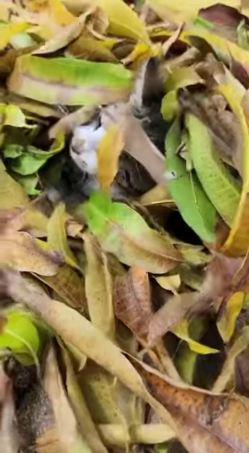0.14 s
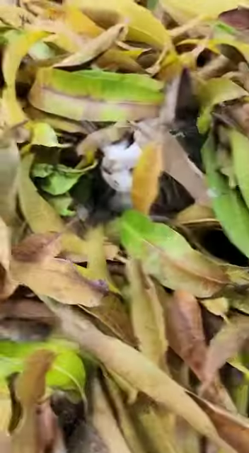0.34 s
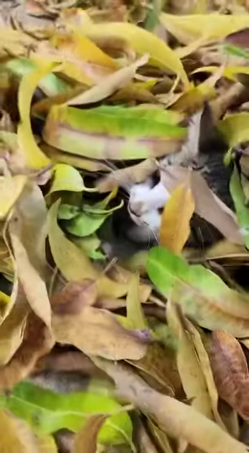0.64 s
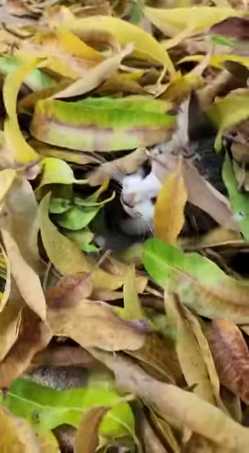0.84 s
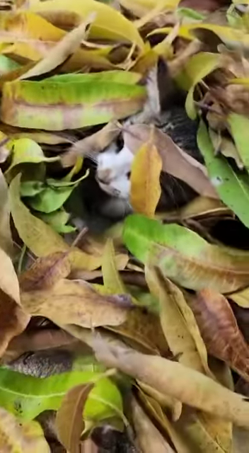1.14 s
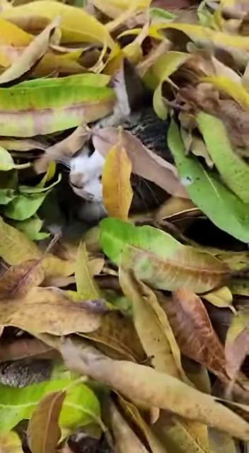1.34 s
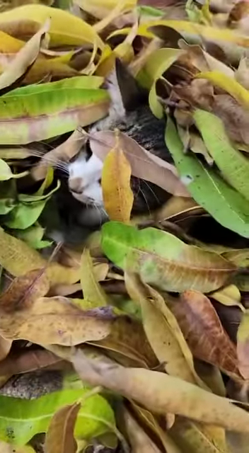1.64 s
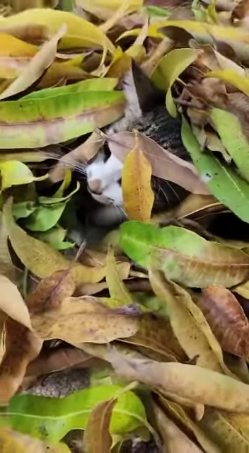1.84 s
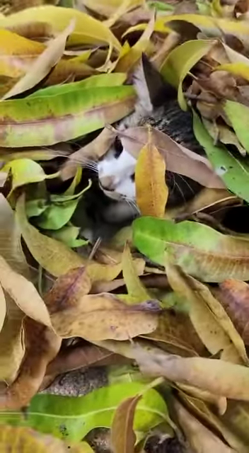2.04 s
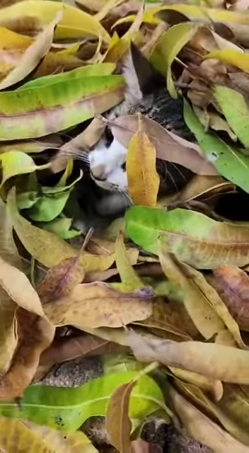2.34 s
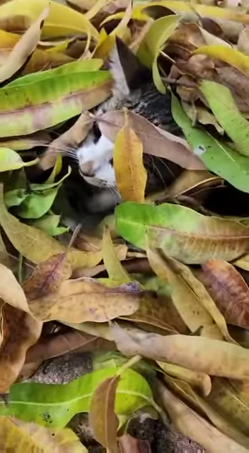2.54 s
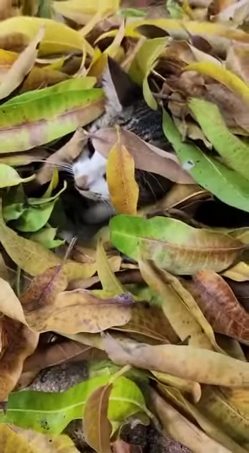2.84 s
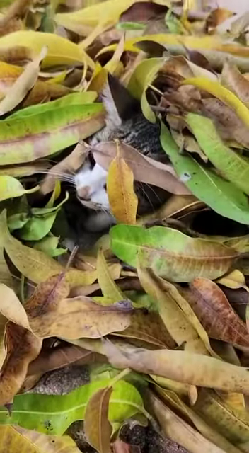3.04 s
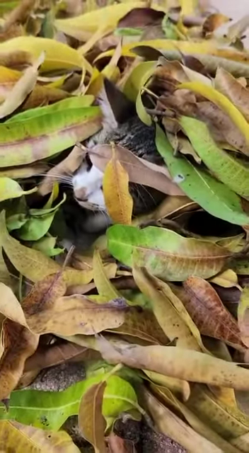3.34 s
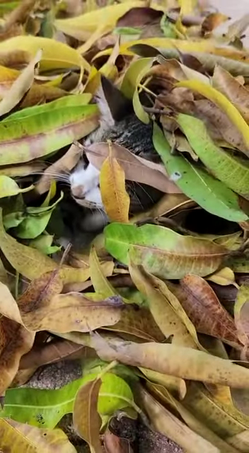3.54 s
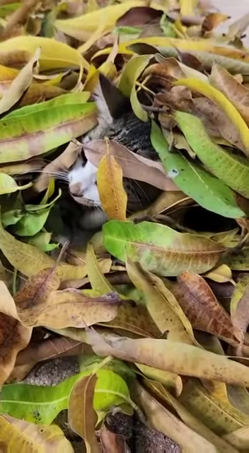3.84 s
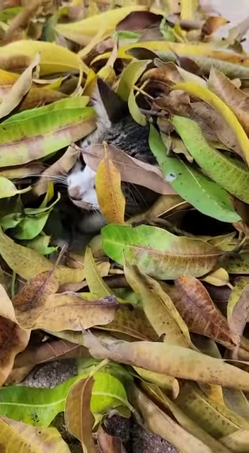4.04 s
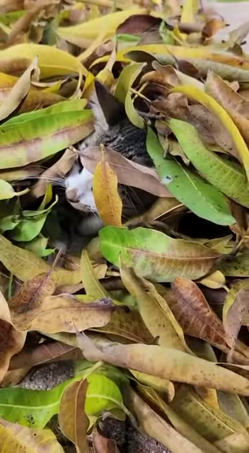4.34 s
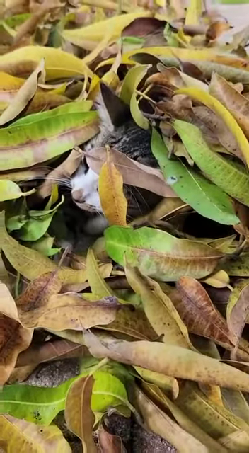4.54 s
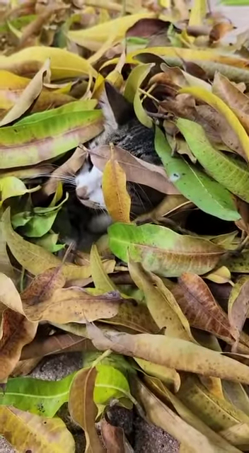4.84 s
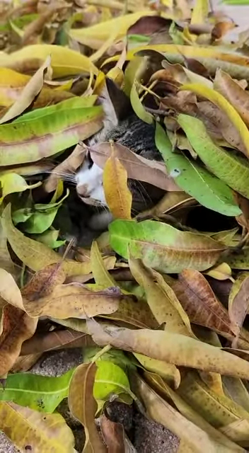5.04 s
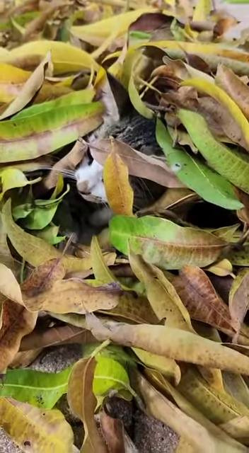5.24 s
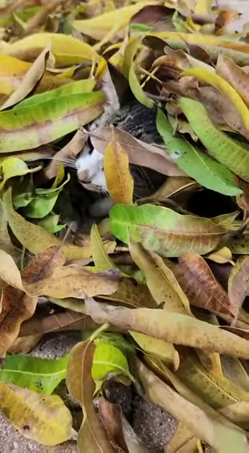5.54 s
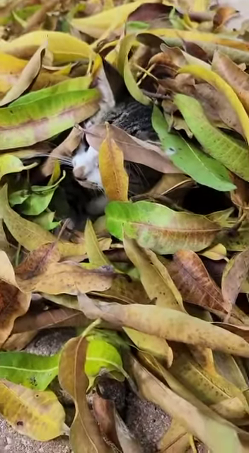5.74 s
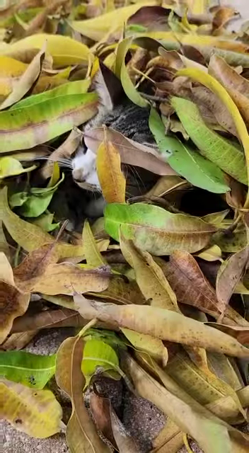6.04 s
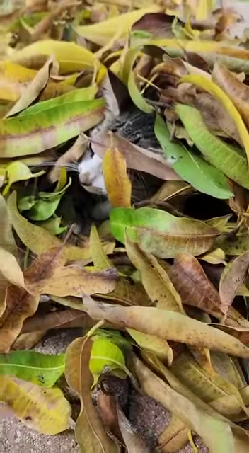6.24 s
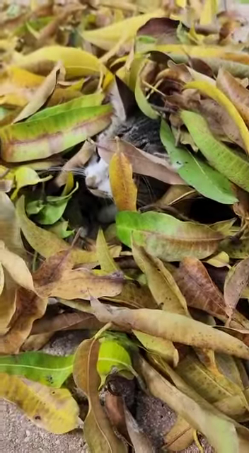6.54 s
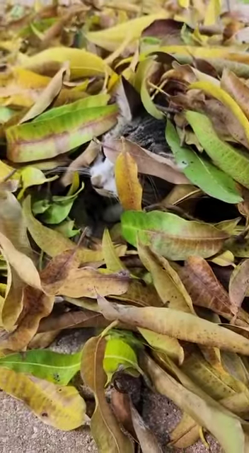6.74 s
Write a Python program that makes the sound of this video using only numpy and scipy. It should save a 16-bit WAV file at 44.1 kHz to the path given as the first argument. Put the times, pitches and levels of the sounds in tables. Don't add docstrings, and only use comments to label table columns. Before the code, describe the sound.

Thin whistles lead into raspy, cracking kitten cries that echo off walls, with leaf rustle and ticks, low wind thumps and faint traffic.

```python
import sys
import numpy as np
from scipy import signal
from scipy.fft import rfft, irfft, next_fast_len
from scipy.io import wavfile
from scipy.ndimage import uniform_filter1d

SR = 44100
rng = np.random.default_rng(int(sys.argv[2]) if len(sys.argv) > 2 else 0)


def persist_wave(psi):
    counts = np.round(np.clip(psi, -1, 1) * 32767).astype(np.int16)
    wavfile.write(sys.argv[1], SR, np.atleast_2d(counts).T)


def gain_from_db(level_db):
    decades = np.asarray(level_db, float) / 20
    return 10 ** decades


N = 303399
TIME = np.arange(N) / SR
FAST = next_fast_len(N, True)
BINS = np.maximum(np.fft.rfftfreq(FAST, 1 / SR), 1)

# time in seconds, pitch in Hz, level in dB.
CRY_CONTOURS = [
    [(.964, 1390, -42), (.985, 1751, -29.5), (.998, 1928, -26), (1.04, 2059, -20.5), (1.085, 2280, -15),
     (1.115, 2276, -18), (1.14, 2270, -28)],
    [(1.432, 1449, -34), (1.45, 1700, -28), (1.48, 2003, -21), (1.5, 2035, -16), (1.543, 2073, -20),
     (1.558, 2189, -14.5), (1.64, 2134, -14.5), (1.69, 2041, -21.5), (1.735, 1902, -28)],
    [(3.593, 1600, -40), (3.625, 2003, -37), (3.66, 2102, -34), (3.712, 2187, -28.5), (3.73, 2402, -26.5),
     (3.75, 2330, -25), (3.78, 2416, -42.5)],
    [(3.793, 1501, -25), (3.812, 1830, -23.5), (3.84, 1929, -18.5), (3.903, 2053, -16), (3.915, 2215, -18),
     (4.005, 2120, -14.5), (4.04, 1990, -23), (4.08, 1792, -39)],
    [(5.66, 1600, -39), (5.69, 1880, -39), (5.72, 2093, -37.5), (5.77, 2159, -35), (5.785, 2320, -35),
     (5.82, 2350, -35), (5.85, 2230, -25.5), (5.9, 2050, -36), (5.97, 1747, -50)],
]
# break time in seconds, unsteadiness at the break (0-1),
# unsteadiness added by the end (0-1), half-pitch level after the break in dB, least breath level in dB.
CRY_BREAKS = [
    (1.13, 0, 0.03, -40.5, -34),
    (1.56, .05, .6, -11, -36),
    (3.72, .3, .2, -25, -15),
    (3.92, .05, .65, -10, -36),
    (5.775, .27, .5, -18, -17),
]
# lowest partial in dB, top partials in dB.
CRY_COLOURS = [(0.5, 13), (-4.5, 11), (3.5, -2), (-5, 12), (-1, 9)]
# frequency in Hz, gain in dB.
THROAT_GAIN = [(1000, -41.5), (1500, -24.5), (2100, -14), (2600, -17.5), (3300, -5), (4200, -3),
               (5300, -2.5), (6300, -3.5), (7300, -3.5), (8200, -13), (10000, -29), (13000, -30),
               (15800, -35)]
# frequency in Hz, gain in dB.
BREATH_GAIN = [(1000, -29), (1500, -16), (2400, -18.5), (3300, 0.5), (4400, -7.5), (5500, -6.5),
               (7200, -13.5), (9000, -15.5), (15800, -29.5)]
# start in seconds, length in seconds, first pitch in Hz, last pitch in Hz, level in dB.
WHISTLE_EVENTS = [(.9, 0.07985, 1990, 2147, -65.5), (1.33, .1, 2050, 2220, -60),
                  (1.43, .035, 2220, 2400, -49), (2.86, 0.11898, 2100, 2038, -63.5),
                  (3.39, .04, 2030, 2130, -64), (3.44, .135, 2190, 2680, -51.5),
                  (5.42, .065, 1840, 2091, -57), (5.49, .085, 2110, 2380, -54),
                  (5.575, 0.0762, 2320, 2188, -61), (5.775, .035, 2420, 2642, -50.5),
                  (5.81, 0.0613, 2520, 2544, -62), (6.35, 0.1016, 2110, 2070, -65),
                  (6.52, 0.13295, 2100, 2064, -67.5)]
# band centre in Hz, time to fall 60 dB in seconds.
ECHO_T60 = [(1500, 0.7227), (3000, 0.5398), (4500, 0.46327), (6500, 0.49328), (9000, 0.40005), (14000, 0.3)]
# frequency in Hz, left minus right in dB.
ANIMAL_LEAN = [(1500, -7), (2200, 3.5), (3300, 3.5), (4300, 6.5), (6300, 5), (7500, 1), (8500, -2),
               (10500, -5), (14000, 4)]
# peak time in seconds, peak level in dB, seconds to swell 10 dB, seconds to fade 10 dB.
RUSTLES = [(.02, -67.5, 0.088, 0.1696), (.45, -78.5, 0.348, 0.2877), (.614, -66, 0.0321, 0.0097),
           (.69, -77, 0.0989, .06), (2.376, -82, .02, .03), (2.72, -83.5, 0.4365, 0.0968),
           (2.808, -69, 0.0755, 0.1043), (3.49, -75, 0.0012, 0.0959), (6.2, -88, 0.4837, 0.0138),
           (6.5, -89, 0.1513, 0.0079), (6.75, -93, 0.24, 1.1777)]
# frequency in Hz, gain in dB.
LEAF_GAIN = [(1180, -34), (2000, -1.5), (2140, -3.5), (4030, -7.5), (4360, -9), (7190, -5), (8930, -19),
             (15800, -24.5)]
# start in seconds, peak level in dB, ring in Hz, left minus right in dB.
LEAF_TICKS = [(0.06, -47, 7290, 2.5), (0.1987, -45.5, 4616, 12), (0.513, -45, 5557, 4),
              (0.61, -29, 4285, 16.5), (0.614, -33, 4561, -6), (2.3693, -49, 2810, 2.5),
              (2.6794, -57, 2500, 9.5)]
# time in seconds, level in dB.
GUST_LEVELS = [(0, -41), (1.3, -39.5), (1.65, -41.5), (1.95, -39.5), (2.14, -32.5), (2.25, -35),
               (2.48, -32.5), (2.6, -39.5), (2.9, -37.5), (3.3, -38.5), (3.5, -43), (3.89, -38),
               (4.05, -41.5), (4.55, -41), (4.69, -35), (4.92, -44), (5.6, -40.5), (6.88, -44)]
# frequency in Hz, gain in dB.
BUFFET_GAIN = [(8.8, -51.5), (15, -38), (40, 1), (64, -4), (96, -5), (151, -24), (358, -36), (400, -30),
               (520, -67), (880, -120)]
# time in seconds, peak level in dB, frequency in Hz.
PORT_THUMPS = [(1.998, -29.5, 70.6), (2.11, -17.5, 58.97), (2.189, -32, 54), (2.248, -25, 79),
               (2.298, -23.5, 69.72), (2.35, -30, 48.4), (2.46, -23, 67.51), (2.599, -31, 66.9),
               (2.828, -25.5, 61.8), (2.919, -28, 43.16), (3.201, -26, 40.57), (3.38, -26.5, 58.22),
               (3.841, -29, 83.07), (4.681, -29.5, 101.4), (5.519, -33.5, 40.15)]
# frequency in Hz, level in dB per Hz.
TOWN_GAIN = [(60, -30), (100, -3), (170, -7), (320, -13.5), (358, -10), (395, -20), (830, -19), (1500, -24),
             (1800, -27), (3400, -34), (7400, -38), (8700, -51), (10000, -58), (15800, -66)]
# frequency in Hz, left-right likeness (-1 to 1).
TOWN_LIKENESS = [(60, 1), (130, 0.9826), (290, 0.9153), (640, 0.6123), (1410, -0.7613), (3100, 0.2915),
                 (6820, -0.37), (15000, 0.29)]


def unit(x):
    return x / np.sqrt(np.mean(x ** 2))


def read(table, hz):
    table_hz, value = np.array(table).T
    return np.interp(np.log(hz), np.log(np.maximum(table_hz, 1)), value)


def colour(x, gain):
    return irfft(rfft(x, FAST) * gain, FAST)[..., :N]


def walk(rate_hz):
    hold = max(int(SR / rate_hz), 1)
    steps = np.repeat(rng.standard_normal(N // hold + 1), hold)
    return unit(uniform_filter1d(uniform_filter1d(steps, hold), hold)[:N])


def pair(likeness):
    mid, side = rfft(rng.standard_normal((2, FAST)))
    share = np.clip(likeness, -.15, .99)
    sign = np.array([[1], [-1]])
    return irfft(np.sqrt(1 + share) * mid + np.sqrt(1 - share) * side * sign, FAST)[:, :N]


def opposed(pan_db):
    return np.array([pan_db, -pan_db]) / 2


def voice(hz, wobble, half_db, low_db, top_db):
    phase = 2 * np.pi * np.cumsum(hz * wobble) / SR
    tone, power = 0, 0
    for k in np.arange(.5, 9.6, .5):
        gain_db = read(THROAT_GAIN, k * hz)
        if k % 1:
            gain_db = gain_db + half_db
        if k == 1:
            gain_db = gain_db + low_db
        if k > 4:
            gain_db = gain_db + top_db
        gain = gain_from_db(gain_db) * (k * hz < .42 * SR)
        tone = tone + gain * np.sin(k * phase + rng.uniform(0, 2 * np.pi))
        power = power + gain ** 2 / 2
    return tone / np.sqrt(power)


def cries():
    wobble = .06 * walk(120) + .045 * walk(600)
    shimmer = walk(90)
    air = unit(colour(rng.standard_normal(N), gain_from_db(read(BREATH_GAIN, BINS))))
    out = np.zeros(N)
    for contour, cry_break, (chest_db, bright_db) in zip(CRY_CONTOURS, CRY_BREAKS, CRY_COLOURS):
        break_s, cracked, hoarse, rattle_db, least_breath_db = cry_break
        s, hz, db = np.transpose(contour)
        on = (TIME > s[0]) & (TIME < s[-1])
        t = TIME[on]
        hz, db = np.interp(t, s, hz), np.interp(t, s, db)
        age_s, broken_s = t - s[0], np.maximum(t - break_s, 0)

        rough = .045 + .9 * np.exp(-(age_s / .022) ** 2 / 2)
        rough = rough + cracked * (broken_s > 0) + hoarse * (broken_s / (s[-1] - break_s)) ** 1.6
        onset_half_db = -8 - 479.5 * age_s
        break_half_db = np.minimum(-37 + 480 * broken_s, rattle_db)
        half_db = np.maximum(onset_half_db, break_half_db)
        breath_db = np.clip(-41.5 + 63 * rough, least_breath_db, 0.5)

        under_db = db.max() - db
        low_db = np.minimum(chest_db + .8 * under_db, 9)
        top_db = bright_db - 24 * np.exp(-age_s / 0.016064) - 0.34 * under_db
        tone = voice(hz, 1 + rough * wobble[on], half_db, low_db, top_db)
        gate = np.clip(np.minimum(age_s, s[-1] - t) / .0038, 0, 1)
        size = gate * gain_from_db(db + 7.0 * rough * (shimmer[on] - .5))
        out[on] += size * (tone + gain_from_db(breath_db) * air[on]) / np.sqrt(1 + gain_from_db(2 * breath_db))
    return out


def whistles():
    waver, flutter_db = 1 + .008 * walk(150), 3 * walk(50)
    out = np.zeros(N)
    for s, length_s, from_hz, to_hz, level_db in WHISTLE_EVENTS:
        on = (TIME > s - .01) & (TIME < s + length_s + .01)
        share = (TIME[on] - s) / length_s
        hz = from_hz + (to_hz - from_hz) * share
        db = level_db + 13 + np.interp(share, [0, .3, 1], [-8, 0, -8]) + flutter_db[on]
        phase = 2 * np.pi * np.cumsum(hz * waver[on]) / SR
        octave_db = -31 + 22 * (hz / 1000 - 2)
        tone = np.sin(phase) + gain_from_db(octave_db) * np.sin(2 * phase)
        out[on] += signal.windows.tukey(len(hz), .3) * gain_from_db(db) * tone
    return out


def yard(x):
    direct_db, echo_db, right_lag_samples = -5.5, -4, 18
    t = np.arange(SR) / SR
    f = np.maximum(np.fft.rfftfreq(SR, 1 / SR), 1)
    tail = 0
    for hz, t60_s in ECHO_T60:
        band_gain = np.exp(-(np.log2(f / hz) / 0.58957) ** 2)
        band = irfft(rfft(rng.standard_normal((2, SR))) * band_gain, SR)
        tail = tail + band * np.exp(-np.log(1000) * t / t60_s)
    tail = unit(tail * np.clip((t - .004) / 0.0037, 0, 1)) / np.sqrt(SR)
    echoes = signal.fftconvolve(x[None], tail, axes=1)[:, :N]
    direct = np.array([x, np.roll(x, right_lag_samples)])
    heard = gain_from_db(direct_db) * direct + gain_from_db(echo_db) * echoes
    return colour(heard, gain_from_db(opposed(read(ANIMAL_LEAN, BINS))))


def rustle():
    stir = 0
    for s, peak_db, swell_s, fade_s in RUSTLES:
        stir = stir + gain_from_db(peak_db - 10 * np.maximum((s - TIME) / swell_s, (TIME - s) / fade_s))
    grains = rng.standard_normal((2, N)) * gain_from_db(1.5 * rng.exponential(size=(2, N)))
    crackle = unit(colour(grains, gain_from_db(read(LEAF_GAIN, BINS)) * (BINS > 1500)))
    return crackle * stir * gain_from_db(16.5 + 3.3 * walk(27))


def ticks():
    out = np.zeros((2, N))
    t = np.arange(400) / SR
    for s, peak_db, hz, pan_db in LEAF_TICKS:
        ring = np.sin(2 * np.pi * hz * t) * np.exp(-t / 0.0005042) * (1 - np.exp(-t / 0.0001))
        scrape = uniform_filter1d(rng.standard_normal((2, 400)), size=5) * np.exp(-t / .003)
        i = int(s * SR)
        level = gain_from_db(peak_db + opposed(pan_db))[:, None]
        out[:, i:i + 400] += 2.0745 * (ring + 0.2196 * scrape) * level
    return out


def wind():
    db = np.interp(TIME, *np.transpose(GUST_LEVELS)) + 1.3086 * walk(8.0128)
    pan_db = -0.47 * (db + 40) + 3.0 * walk(7)
    buffet = unit(colour(pair(0.87), gain_from_db(read(BUFFET_GAIN, BINS)) * (BINS < 400)))
    return buffet * gain_from_db(db + opposed(pan_db))


def thumps():
    out = np.zeros((2, N))
    for s, peak_db, hz in PORT_THUMPS:
        on = abs(TIME - s) < .06
        t = TIME[on] - s - .006
        eddy = np.sin(2 * np.pi * hz * t) * np.exp(-(t / 0.01205) ** 2)
        out[:, on] += eddy * gain_from_db(peak_db + opposed(-7.5))[:, None]
    return out


def town():
    hum = rfft(pair(read(TOWN_LIKENESS, BINS)), FAST) * gain_from_db(read(TOWN_GAIN, BINS)) * (BINS > 100)
    out = 0
    for hz in 125 * 2 ** np.arange(8):
        share = np.cos(np.pi / 2 * np.clip(np.log2(BINS / hz), -1, 1)) ** 2
        out = out + irfft(hum * share, FAST)[:, :N] * gain_from_db(0.5829 * walk(2.509))
    return unit(out) * gain_from_db(-44)


def scene():
    animal = yard(cries() + whistles())
    return animal + rustle() + ticks() + wind() + thumps() + town()


def top_cut(x):
    return signal.sosfilt(signal.butter(12, 16230, fs=SR, output="sos"), x)


def record(dry):
    return top_cut(dry)


dry = scene()
out = record(dry)
persist_wave(out)
```